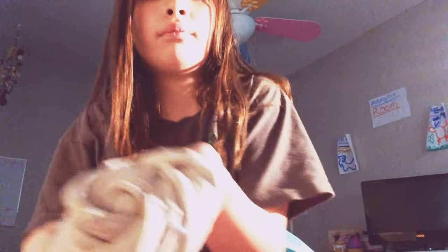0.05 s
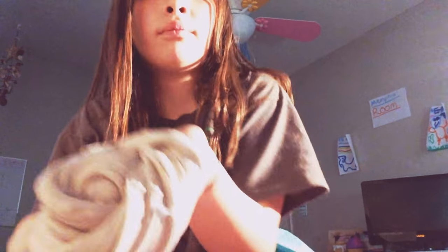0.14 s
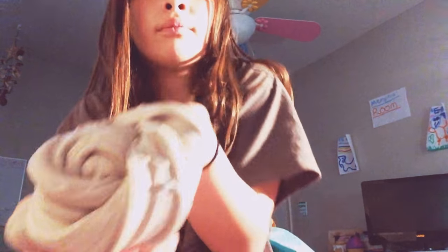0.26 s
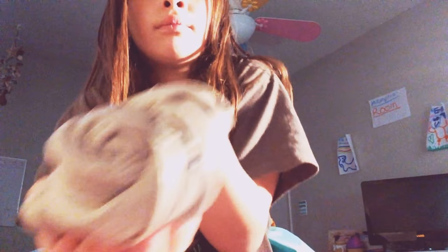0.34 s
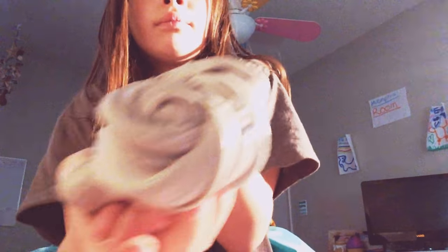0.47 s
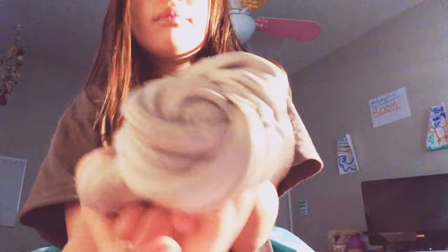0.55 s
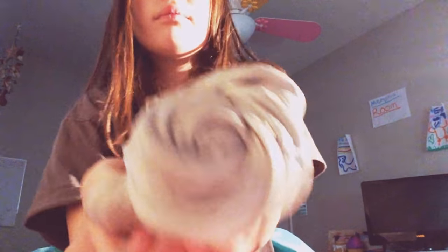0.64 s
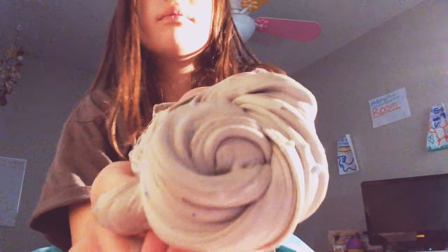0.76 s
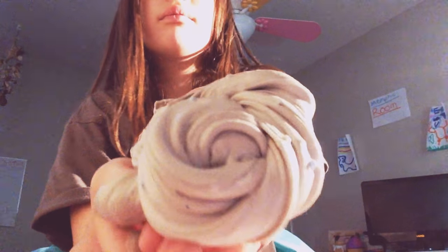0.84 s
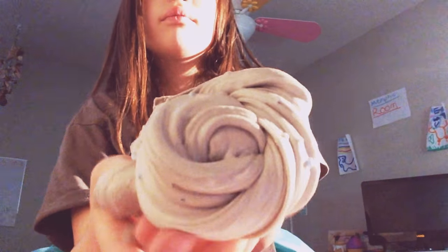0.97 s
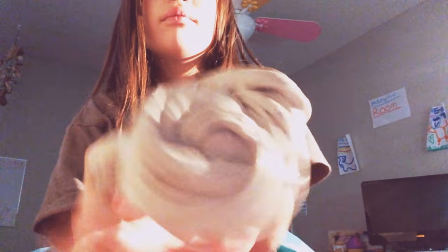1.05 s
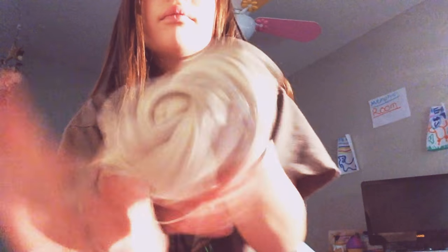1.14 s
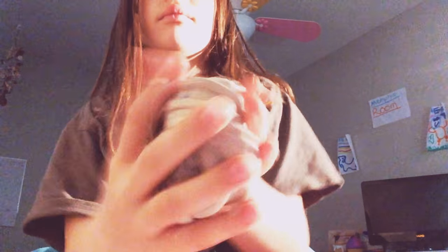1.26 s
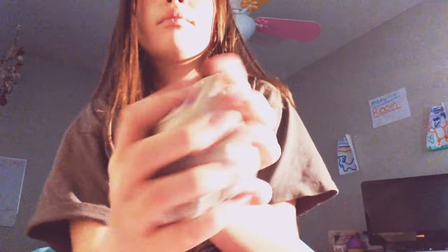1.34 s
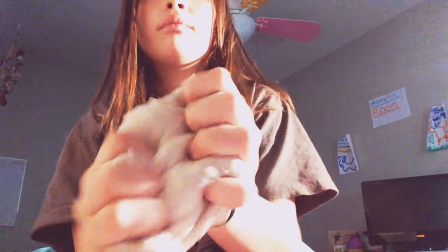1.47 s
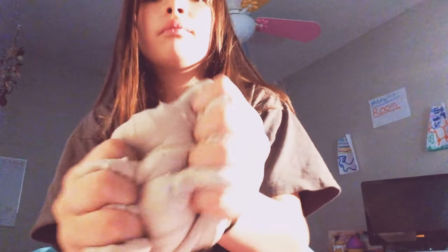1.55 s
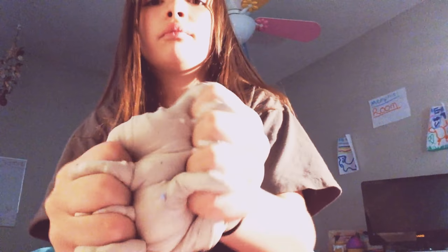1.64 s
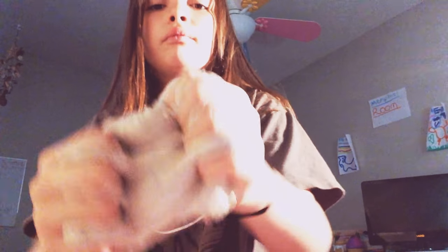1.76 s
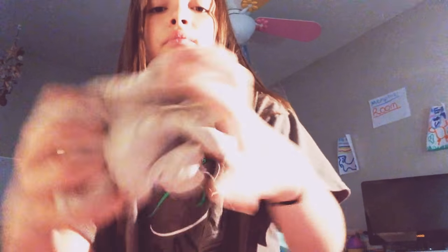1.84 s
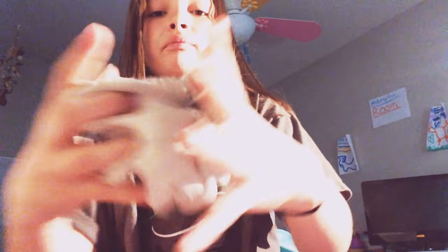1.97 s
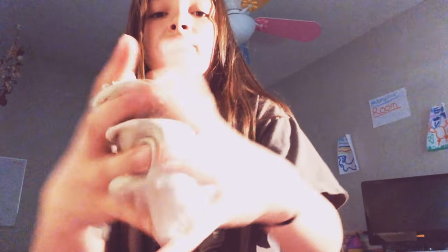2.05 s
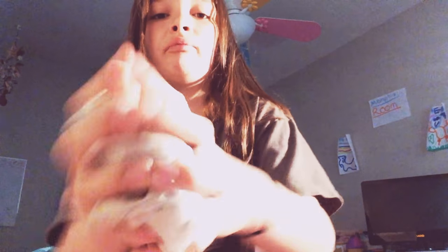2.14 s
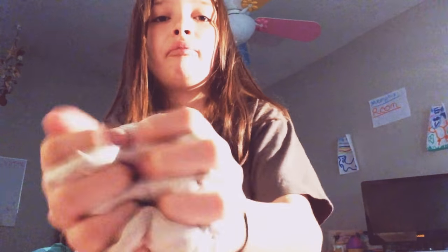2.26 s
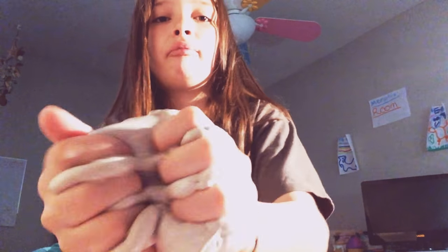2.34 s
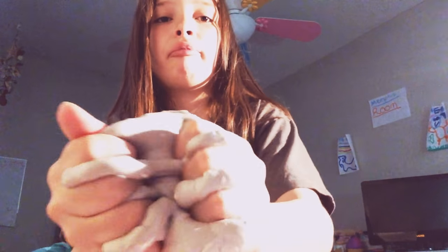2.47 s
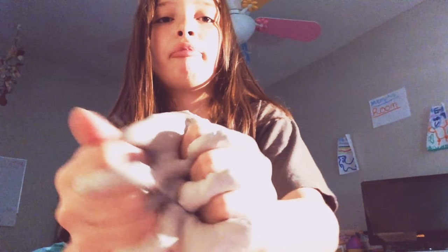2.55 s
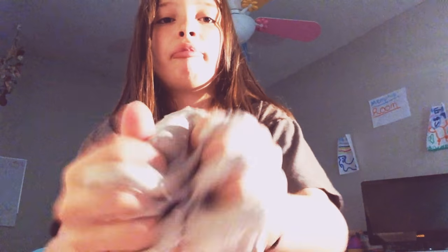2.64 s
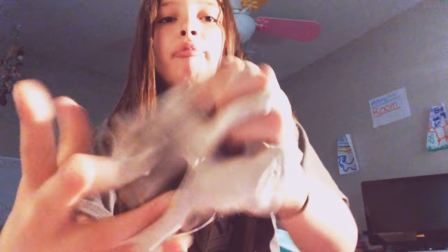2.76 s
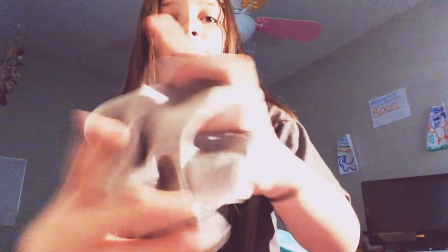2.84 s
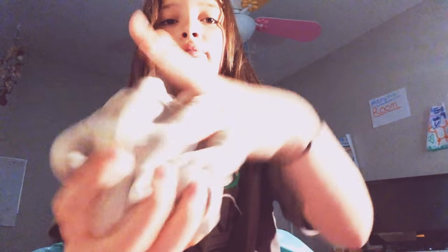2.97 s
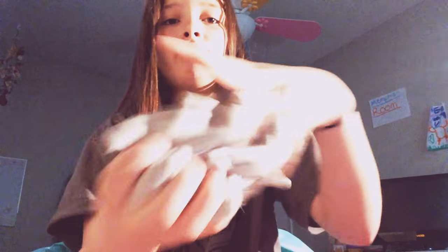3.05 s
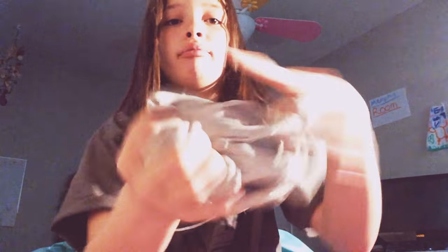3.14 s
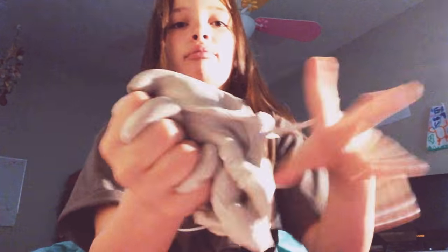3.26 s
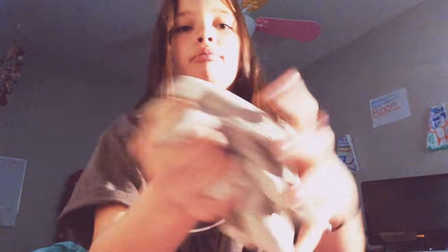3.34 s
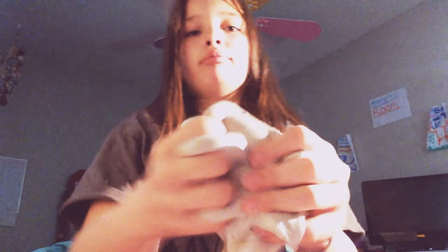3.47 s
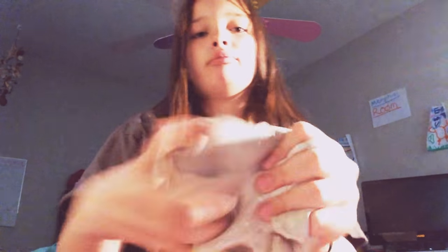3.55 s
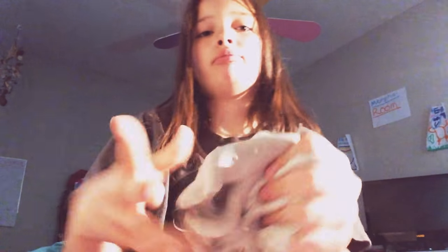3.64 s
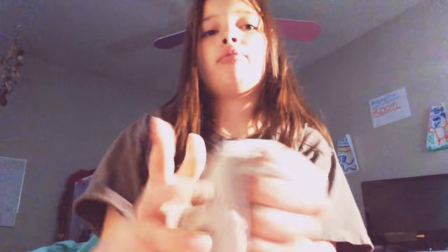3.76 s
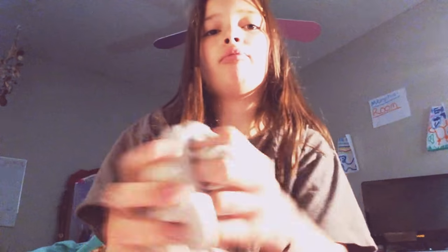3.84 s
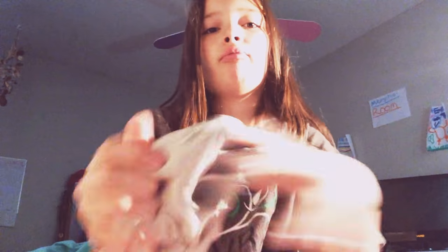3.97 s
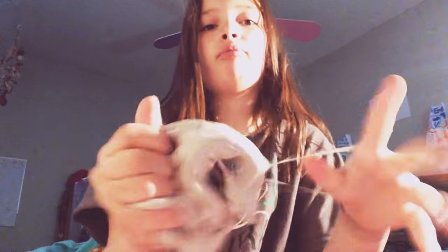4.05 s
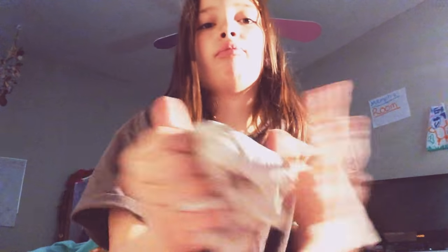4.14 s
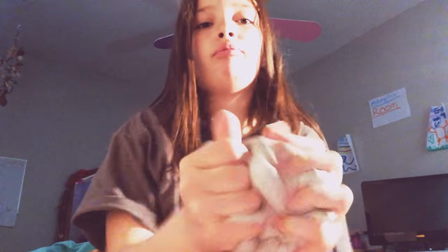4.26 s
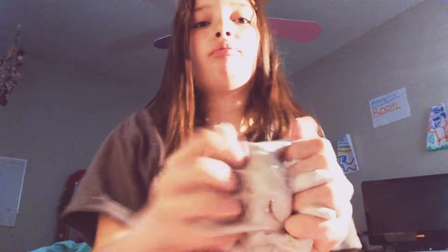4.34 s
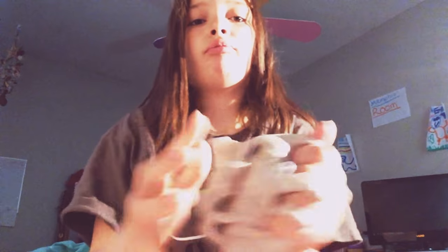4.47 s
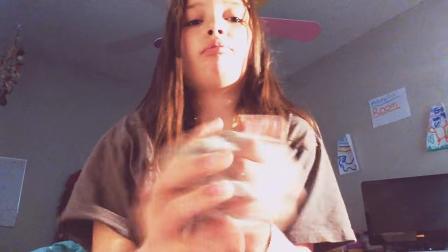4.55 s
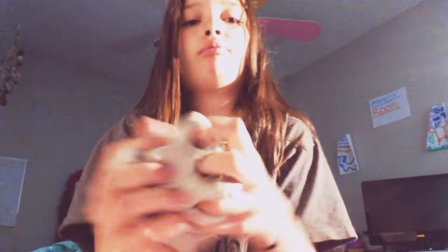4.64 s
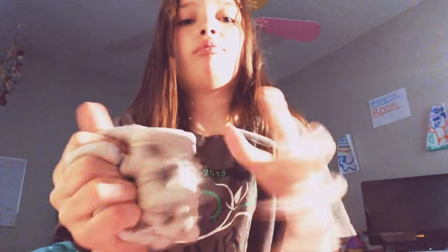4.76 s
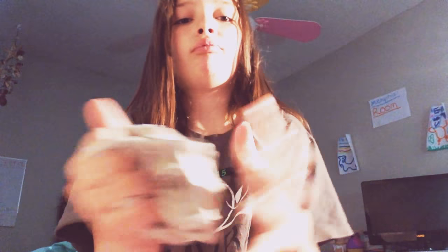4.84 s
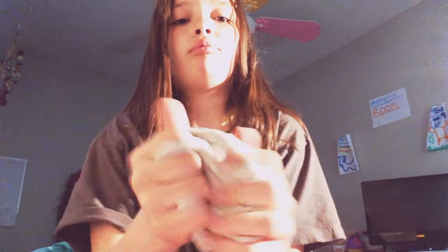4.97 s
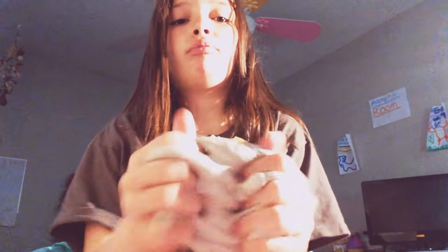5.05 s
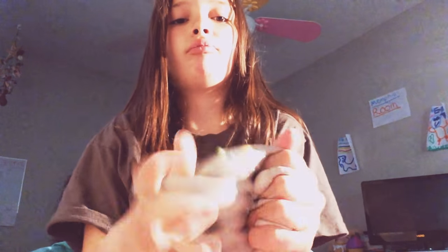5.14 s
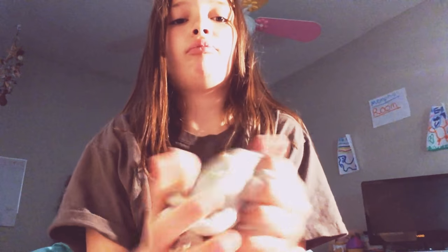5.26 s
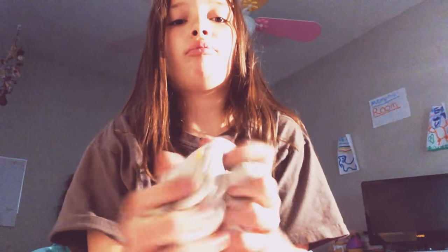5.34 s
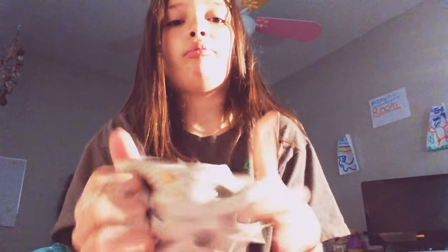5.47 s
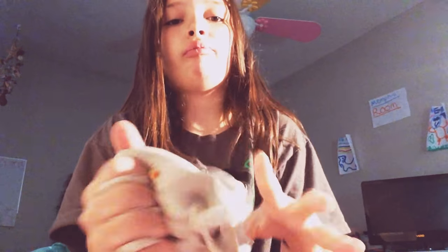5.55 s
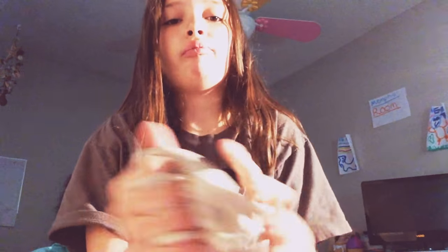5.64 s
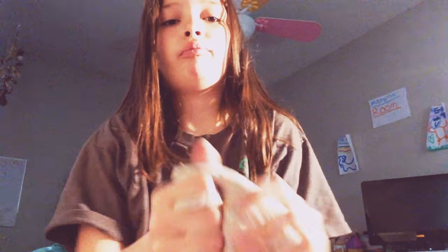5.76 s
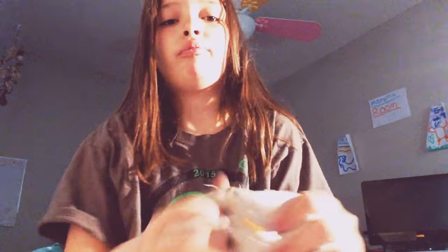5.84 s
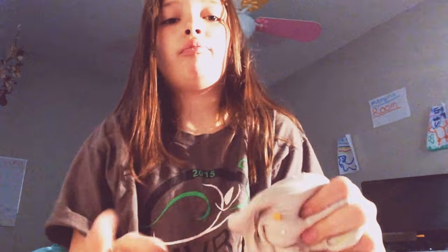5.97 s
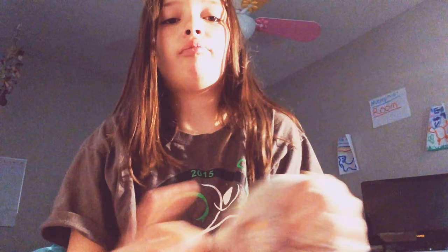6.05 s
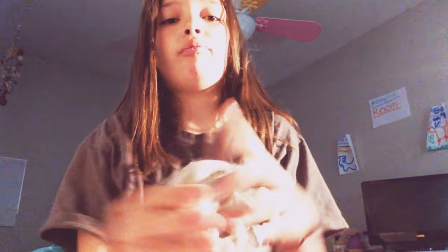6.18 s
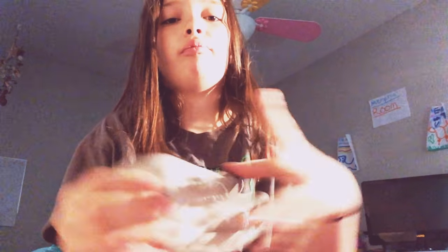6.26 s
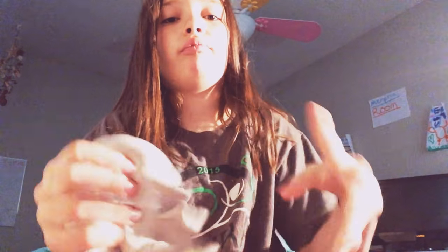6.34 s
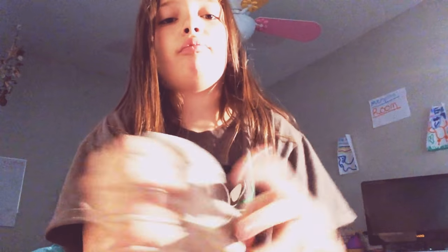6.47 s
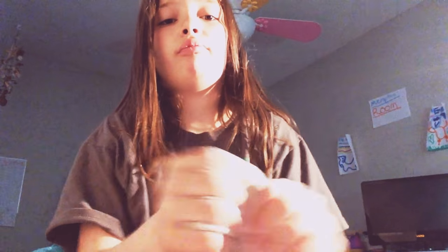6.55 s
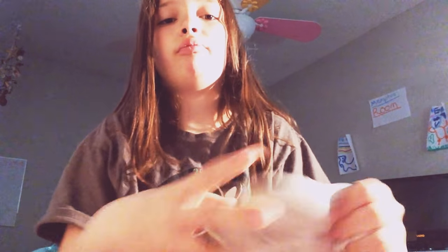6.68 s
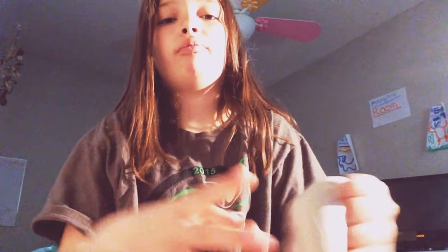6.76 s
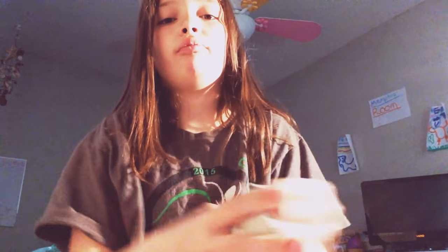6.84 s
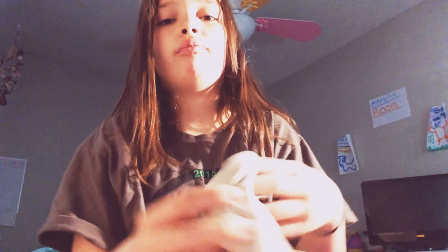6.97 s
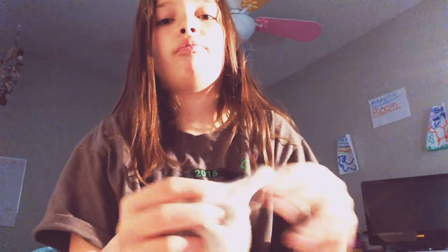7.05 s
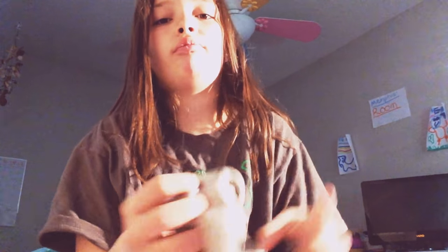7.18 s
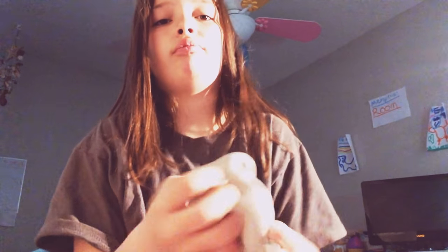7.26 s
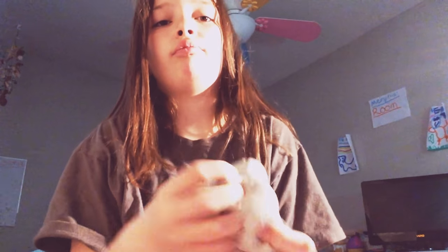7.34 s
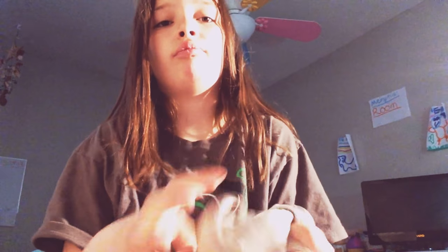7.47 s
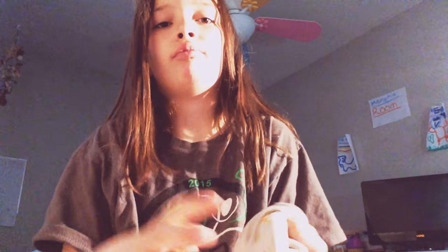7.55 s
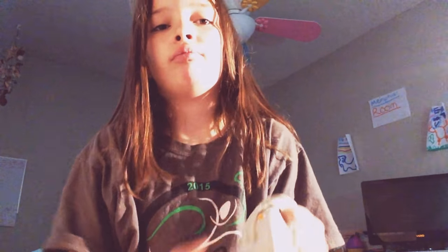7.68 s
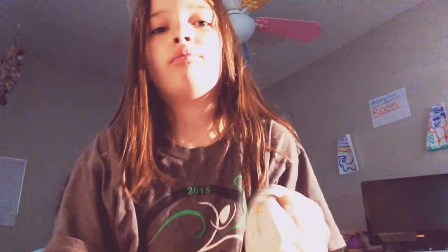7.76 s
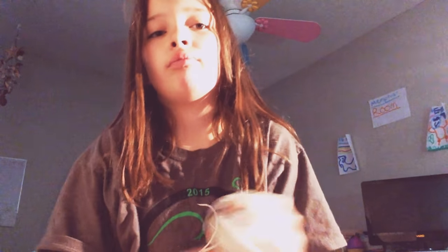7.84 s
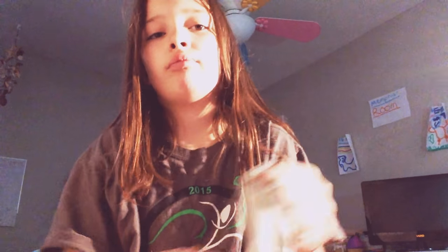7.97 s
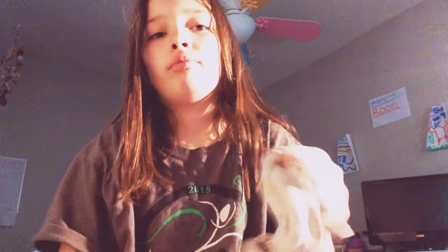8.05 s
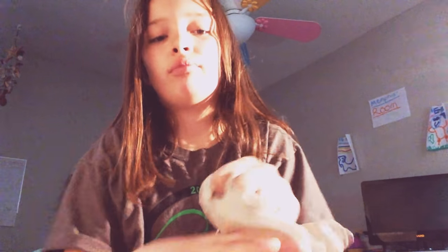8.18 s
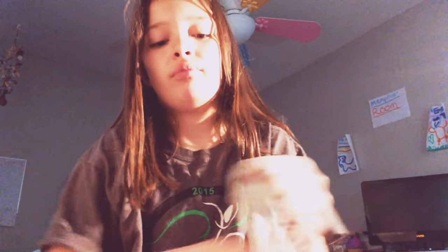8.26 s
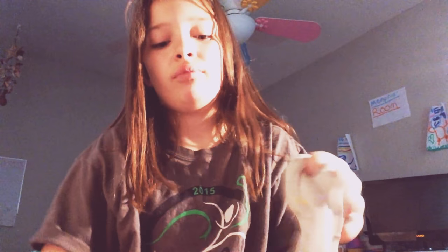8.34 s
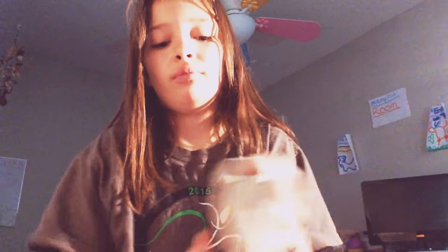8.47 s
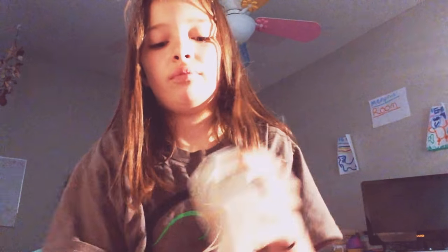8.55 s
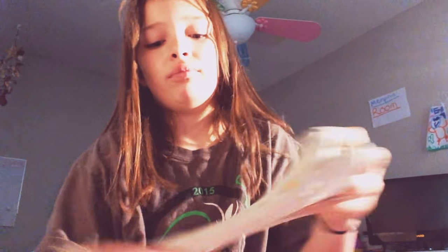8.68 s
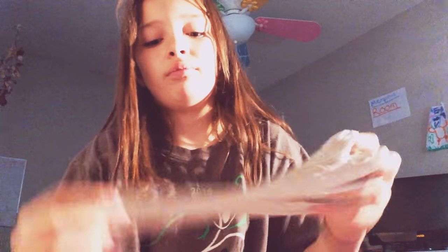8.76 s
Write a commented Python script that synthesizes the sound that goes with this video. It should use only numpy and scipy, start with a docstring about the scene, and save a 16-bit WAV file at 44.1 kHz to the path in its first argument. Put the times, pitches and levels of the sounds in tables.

```python
"""A quiet room, a small microphone close to two hands kneading a lump of fluffy slime.
Each squeeze bursts a random cloud of tiny ringing air cells: a low squelch and a high wet fizz.
Larger bubbles pop sharply, as a film snap plus a cavity ring; some open pockets ring on with filtered noise.
A near surface doubles every pop, the room adds wall reflections and a short tail to pops and kneading,
and sticky ticks, steady air noise and faint wavering hum tones lie beneath."""
import sys
import numpy as np
from scipy import signal
from scipy.fft import rfft, irfft, next_fast_len
from scipy.io import wavfile

SR = 44100
rng = np.random.default_rng(int(sys.argv[2]) if len(sys.argv) > 2 else 0)


def store_pcm(level_fs):
    """Save levels as 16-bit WAV."""
    pcm = np.round(np.clip(level_fs, -1, 1) * 32767).astype(np.int16)
    wavfile.write(sys.argv[1], SR, np.atleast_2d(pcm).T)


N = 388521
KNEAD_S = 1.4  # small bubbles and sticky ticks start here, s


def amp(db):
    """Decibels to an amplitude factor."""
    return 10 ** (np.asarray(db) / 20)


def unit(x):
    """Scales x to an RMS of one."""
    return x / np.sqrt(np.mean(x ** 2) + 1e-20)


def read(points, hz):
    """Reads a table of (Hz, value) joined by lines on a log-frequency axis."""
    f, value = np.transpose(points)
    return np.interp(np.log(hz + 1), np.log(f + 1), value)


def coloured(x, spectrum):
    """Filters x by the gains of a (Hz, dB) table."""
    size = next_fast_len(len(x))
    gain = amp(read(spectrum, np.fft.rfftfreq(size, 1 / SR)))
    return irfft(rfft(x, size) * gain, size)[:len(x)]


def causal(gain):
    """The minimum-phase response with this gain: sudden start, dying end."""
    both_sides = np.r_[gain, gain[-2:0:-1]]
    log_gain = np.log(np.maximum(both_sides, gain.max() * 1e-4))
    return np.exp(np.conj(signal.hilbert(log_gain)))[:len(gain)]


def add(mix, s, sound):
    """Lays a sound into the mix at s seconds, cut at the end of the mix."""
    part = mix[max(round(s * SR), 0):][:len(sound)]
    part += sound[:len(part)]


def pops(snap_low_hz=700, snap_top_hz=9000, bounce=0.54, bounce_s=.00116, bounce_hz=1500,
         wander=0.092, tear_s=0.00014, size=2048):
    """The film snaps, the opened cavity rings for a few cycles, and a near surface returns both."""
    # large bubbles: t/s, ring level/dB before colouring, cavity f/Hz, cavity Q,
    # snap level/dB before colouring, f/Hz above which slime muffles it, level/dB thrown into the room
    large_bubbles = [(0.142, -39, 950, 4, -60, 4000, 16.5), (1.5297, -19, 8100, 1.1, -26, 14300, 5),
                     (1.5521, 1, 11300, 5, -14, 10100, 6), (1.6184, -5.5, 5860, 1.6, -15.5, 10600, -0.5),
                     (1.6474, -14.5, 9350, 1.8, -24, 14500, -2), (1.6541, -13.5, 5520, 1.6, -42, 9200, 1),
                     (1.9577, -25, 960, 1.1, -20.5, 11100, 3.5), (2.0994, -26, 5400, 3.7, -53, 13800, 2),
                     (2.2301, -18, 10970, 5.5, -24, 20000, -1), (2.2344, -26, 2940, 6, -17, 10900, -2),
                     (2.3404, -4, 4610, .9, -12, 10600, -1.5), (2.4183, 5, 11230, 1.1, -19.5, 20000, 3),
                     (2.425, 8, 8950, 3.6, -8.5, 13100, -3), (2.4701, -16, 1260, 1.1, -46, 2220, 0),
                     (2.502, -20, 1480, 1, -45, 2500, 10), (3.0812, -31, 9300, 6, -30.5, 20000, -5),
                     (3.1817, -13, 13300, 1.3, -19.5, 5900, 3), (3.2204, -8, 4130, 1.2, -12, 10000, 2),
                     (3.343, -13.5, 11780, 2, -20, 20000, 1), (3.5424, -24, 684, 5.4, -17.5, 14500, 11),
                     (3.5513, -14, 5670, 3.9, -43, 13200, 6), (3.605, -14.5, 1080, 4.4, -23.5, 14000, -3),
                     (3.6315, -18, 2580, 1.8, -46, 14300, 5), (3.7133, -2.5, 13340, 4.7, -18.5, 12200, 1.5),
                     (3.7172, -17, 1180, 4.5, -23, 20000, 8), (3.7991, -25.5, 5190, 6, -25, 9100, 2.5),
                     (3.8304, -18.5, 543, 3.7, -32.5, 20000, 0),
                     (3.993, -13.5, 2380, 3.5, -7.5, 3700, -1.5),
                     (4.0454, -20.5, 8330, 1.7, -47, 12580, 2.5), (4.098, -35, 680, 7.6, -22.5, 13700, 7.5),
                     (4.1239, 1, 11890, .93, -29.5, 20000, -1.5),
                     (4.1908, -23.5, 11290, .7, -32, 12590, 0.5), (4.2045, 20, 6538, 1.3, 2.5, 6500, -1),
                     (4.2411, 12, 9500, 3.3, -5, 13000, 2.5), (4.3937, -22, 9700, 2.5, -27, 19840, 13),
                     (4.4485, 3.5, 7230, 2.3, -16.5, 20000, -1), (4.499, 5.5, 669, 2.8, 7, 16060, 0),
                     (4.5287, -21.5, 1590, 1.6, -10.5, 7900, 3.5), (4.5908, -25, 580, 1, -53.5, 2010, 12),
                     (4.773, -20.5, 6920, 6, -22.5, 12600, 6), (4.836, -25, 339, 3.6, -44, 13000, -2),
                     (4.8497, 14.5, 10480, 3.9, -1.5, 8280, 0.5),
                     (4.9466, -18.5, 1210, 3.1, -21, 20000, 3.5), (4.9505, -27, 383, .8, -15, 9500, -1),
                     (5.3869, -27, 1060, 1.4, -30, 17000, 9), (5.9523, -7, 6270, .76, -34, 12300, 2.5),
                     (6.1632, -23, 870, 2, -24, 16000, 10), (6.339, -39, 370, 2, -19, 9900, 5),
                     (6.3472, -5.5, 10800, 5.5, -22, 12450, -7.5), (6.6249, -26.5, 377, .8, -39, 13700, -5),
                     (6.6553, -12.5, 12800, 6, -14, 15000, 4), (6.895, -29, 614, 1.2, -42, 20000, 4),
                     (6.9628, -20, 4020, 4.6, -38, 14800, 9), (7.3042, -31, 2190, 5, -42, 20000, 5),
                     (7.406, -30.5, 356, 4.2, -29, 20000, 3), (7.8916, -23.5, 430, 1.5, -24.5, 20000, 1.5),
                     (7.911, -26.5, 740, 1.5, -38, 20000, .5), (8.1729, -25.5, 850, 4, -27.5, 20000, 4),
                     (8.1769, -19.5, 1060, 3.7, -29, 20000, 3), (8.5939, -30.5, 927, 1.2, -32.5, 13220, 7)]
    # colour of the pops at the microphone: f/Hz, level/dB
    pop_colour = [(40, -27), (110, -8.5), (200, 8), (430, 0.5), (850, 0), (1400, 1.5), (2600, 0.5),
                  (3900, -6.5), (5300, -5), (6200, 0.5), (7400, -6.5), (9300, 5), (10600, -1), (15500, 0.5)]
    direct, thrown = np.zeros(N), np.zeros(N)
    f = np.fft.rfftfreq(size, 1 / SR)
    snap = unit(f / np.hypot(f, snap_low_hz) / np.hypot(1, f / snap_top_hz))
    colour = amp(read(pop_colour, f))
    bubbles = large_bubbles + small_bubbles()
    places = rng.uniform(-1, 1, size)
    for place, (s, ring_db, hz, q, snap_db, muffle_hz, room_db) in zip(places, bubbles):
        ring = unit(f / np.hypot(f, q * (hz - f * f / hz)))
        muffle = np.sqrt(1 / (1 + (f / muffle_hz) ** 10) + 0.03)
        burst = causal(colour * muffle * np.hypot(amp(ring_db) * ring, amp(snap_db) * snap))
        # a larger, lower bubble takes longer to tear open, which spreads its treble in time
        lag = tear_s * (snap_top_hz / hz) ** .6 * f / snap_top_hz
        burst = burst * np.exp(-1j * np.pi * f * lag)
        # the small surface returns mostly treble, over a path that differs as the hands move
        delay = bounce_s * (1 + wander * place)
        echo = bounce * f / (f + bounce_hz) * np.exp(-2j * np.pi * f * delay)
        add(direct, s, irfft(burst * (1 + echo))[:size // 2])
        # how much reaches the walls depends on which way the bubble opens
        add(thrown, s, amp(room_db) * irfft(burst)[:size // 2])
    return direct + room(thrown)


def small_bubbles(per_s=8, crowding=.4, light_touch=.15, firm_db=-54, growth=.25,
                  ring_db=-30.5, snap_db=-33, spread_db=4, low_hz=400, high_hz=10000,
                  q=3, muffle_hz=12000, room_db=1, count=512):
    """Faint pops, as rows like those of the large bubbles; firm pressure bursts more, and louder."""
    when, size, ring, snap = rng.random((count, 4)).T
    # force as a share of a firm squeeze, never below a light touch
    force = np.maximum(pressure(column=1) / amp(firm_db), light_touch)
    chance = force ** crowding * (np.arange(N) > KNEAD_S * SR)
    # running count of bubbles, averaging per_s over the kneading
    expected = np.cumsum(chance) / chance.sum() * per_s * (N / SR - KNEAD_S)
    starts = np.searchsorted(expected, np.arange(count) + when)
    push_db = growth * 20 * np.log10(force)
    rows = []
    for at, ring_draw, pitch_draw, snap_draw in zip(starts, 2 * ring - 1, size, 2 * snap - 1):
        if at < N:
            ring_level = ring_db + push_db[at] + spread_db * ring_draw
            snap_level = snap_db + push_db[at] + spread_db * snap_draw
            hz = low_hz * (high_hz / low_hz) ** pitch_draw
            rows.append((at / SR, ring_level, hz, q, snap_level, muffle_hz, room_db))
    return rows


def pockets():
    """Escaping air keeps a soft-walled pocket ringing unevenly for a moment."""
    # air pockets ringing on after a burst: t/s, f/Hz, level/dB before onset and decay, t60/s, Q
    open_pockets = [(3.718, 1140, -53.5, 0.16, 6.8), (3.831, 510, -49.5, 0.16, 3.2),
                    (4.499, 653, -13.5, 0.025, 5.9), (4.499, 1270, -10.5, 0.015, 6),
                    (4.503, 320, -35, 0.082, 2), (4.515, 1354, -37, .15, 1.5),
                    (7.893, 450, -55.5, 0.11, 1.7), (8.195, 300, -52.5, 0.092, 2)]
    out, t = np.zeros(N), np.arange(SR // 4) / SR
    noises = rng.standard_normal((len(open_pockets), SR))
    for (s, hz, db, t60, q), air in zip(open_pockets, noises):
        cavity = signal.iirpeak(hz, q, fs=SR)
        resonant_air = signal.lfilter(*cavity, signal.lfilter(*cavity, air))
        ring = unit(resonant_air)[-len(t):]
        decay = np.exp(-np.log(1000) * t / t60)
        onset = 1 - np.exp(-hz * t)
        add(out, s, amp(db) * ring * decay * onset)
    return out


def kneading(squelch_db=0.5, fizz_db=0.0, room_db=2):
    """Each squeeze drives the squelch and the fizz; a broad crackle sounds in both."""
    # squelch of the larger air cells: f/Hz, filter level/dB
    squelch_colour = [(60, -32.5), (170, -5.5), (330, 0.5), (450, -10), (750, 0), (1350, -5), (1750, -3),
                      (2250, -6), (2800, -5), (3800, -11.5), (7000, -27)]
    # fizz of the smallest air cells: f/Hz, filter level/dB
    fizz_colour = [(600, -33.5), (2700, -8.5), (4000, -7.5), (5000, -6.5), (6200, -1), (7600, -7),
                   (9500, 2.5), (11200, -4), (14200, -1), (16000, -10)]
    crackle = amp(-10) * cells(per_s=2500, spread_db=3.5)
    large = ringing_cells(low_hz=300, high_hz=3600, q=6, per_s=140, spread_db=3.5, clump_db=9)
    small = ringing_cells(low_hz=3500, high_hz=15000, q=9, per_s=330, spread_db=3.8, clump_db=8)
    squelch = amp(squelch_db) * unit(coloured(large + 2 * crackle, squelch_colour))
    fizz = amp(fizz_db) * unit(coloured(small + crackle, fizz_colour))
    lurch = stick_slip(depth_db=3.5, per_s=65)
    wet = lurch * (squelch * pressure(column=0) + fizz * pressure(column=1))
    return wet + amp(room_db) * room(wet)


def pressure(column):
    """Level of one layer, squelch (0) or fizz (1), as the fingers press in and let go."""
    # squeezes and pulls: peak t/s, rise t/s and fall t/s (to 1/e of the peak amplitude),
    # squelch level/dB and fizz level/dB, both before layer trims and lurches
    squeezes = [(1.16, .057, .088, -69.5, -62), (1.46, .12, .34, -86, -65.5), (1.852, .046, .09, -52, -47),
                (2.381, .26, .15, -67, -65.5), (2.742, .068, .089, -52.5, -49.5),
                (3.17, .18, .16, -69.5, -64.5), (3.553, .046, .073, -54, -50.5),
                (3.925, .085, 0.11, -57.5, -54), (4.381, .08, .11, -59.5, -52),
                (4.684, .046, .1, -58, -53.5), (5.135, .09, .058, -58, -52.5),
                (5.397, .055, .11, -60, -55.5), (5.93, .09, .058, -59.5, -50),
                (6.171, .014, .11, -57.5, -51.5), (6.672, .06, .06, -57, -52.5),
                (6.97, .092, .05, -65, -60), (7.415, .018, .083, -64, -58), (7.899, .012, .016, -63, -62),
                (8.022, .054, .022, -67, -59), (8.32, .12, .03, -65, -64.5), (8.551, .11, .087, -65, -64.5)]
    t, power = np.arange(0, N, 64) / SR, 0
    for s, rise, fall, *levels_db in squeezes:
        away = abs(t - s) / np.where(t < s, rise, fall)
        power = power + amp(levels_db[column]) ** 2 * np.exp(-2 * away ** 2)
    return np.interp(np.arange(N) / SR, t, np.sqrt(power))


def ringing_cells(low_hz, high_hz, q, per_s, spread_db, clump_db, count=14):
    """Cells of many sizes ring briefly, each size at its own pitch, rate per_s and clumps."""
    out = np.zeros(N)
    for hz in np.geomspace(low_hz, high_hz, count):
        clump = stick_slip(depth_db=clump_db, per_s=55)
        bursts = clump * cells(per_s, spread_db)
        out += signal.lfilter(*signal.iirpeak(hz, q, fs=SR), bursts)
    return unit(out)


def cells(per_s, spread_db):
    """Air cells burst at random as clicks of either sign: mostly tiny, a few large."""
    size_db = spread_db * np.minimum(rng.exponential(1, N), 3.8)
    sizes = amp(size_db) * rng.choice([-1, 1], N)
    return unit(sizes * (rng.random(N) < per_s / SR))


def stick_slip(depth_db, per_s):
    """The slime gives way in small uneven lurches: a gain gliding between random levels."""
    knots = np.arange(0, N + SR, SR / per_s)
    levels = rng.uniform(-0.73, 1, len(knots))
    return amp(depth_db * np.interp(np.arange(N), knots, levels))


def sticky_ticks(level_db=-76):
    """Fingers peel off the tacky surface with faint soft ticks from KNEAD_S on."""
    ticks = ringing_cells(low_hz=500, high_hz=11000, q=3, per_s=4, spread_db=2, clump_db=2)
    return amp(level_db) * ticks * (np.arange(N) > KNEAD_S * SR)


def room(x, tail_db=-18, build_s=0.008, near_db=-17, near_s=0.0031):
    """Scatter off hands and body, a few wall reflections, then a short diffuse tail."""
    # room decay: f/Hz, t60/s
    room_t60 = [(200, .33), (1000, 0.17), (4000, 0.44), (9000, 0.22), (16000, 0.18)]
    # first wall reflections: delay t/s, level/dB
    walls = [(.0093, -24.5), (0.0208, -32.5), (0.0279, -30)]
    t = np.arange(SR // 2) / SR
    # noise whose bands each die away at their own rate
    hz, when, z = signal.stft(rng.standard_normal(len(t)), SR, nperseg=256)
    decay = np.exp(-np.log(1000) * when / read(room_t60, hz)[:, None])
    tail = signal.istft(z * decay, SR, nperseg=256)[1][:len(t)]
    tail = tail * (1 - np.exp(-(t / build_s) ** 2))
    near = rng.standard_normal(len(t)) * t * np.exp(-t / near_s * 2)
    response = amp(tail_db) * tail / np.linalg.norm(tail)
    response += amp(near_db) * near / np.linalg.norm(near)
    for delay, db in walls:
        response[round(delay * SR)] += amp(db)
    return signal.oaconvolve(x, response)[:N]


def background(air_db=-64.5, hum_db=-1, waver=.005, flutter_db=2.5):
    """Steady noise of room air and microphone hiss, with faint wavering hum tones."""
    # still room and microphone hiss: f/Hz, filter level/dB
    air_colour = [(25, -35), (70, -25.5), (110, -8), (170, -2), (300, -7), (450, -12.5), (620, -10.5),
                  (950, -17), (2300, -19), (4500, -21), (9500, -21), (16000, -24.5)]
    # hum tones: centre f/Hz, RMS level/dB before hum_db and flutter, start t/s, end t/s
    hum_tones = [(352, -72, -.2, .6), (393, -71, .95, 3.3), (393, -76, 3.2, 4.5), (620, -77, .5, 1.5),
                 (600, -80, 5.8, 8.8)]
    t, knots = np.arange(N) / SR, np.arange(0, N / SR + 1, 1 / 10)
    out = amp(air_db) * unit(coloured(rng.standard_normal(N), air_colour))
    for hz, db, start, end in hum_tones:
        drift = np.interp(t, knots, rng.standard_normal(len(knots)))
        swell = np.interp(t, knots, rng.standard_normal(len(knots)))
        fade = np.clip(np.minimum(t - start, end - t) / .22, 0, 1)
        level = np.sqrt(2) * amp(db + hum_db + flutter_db * swell)
        phase = 2 * np.pi * np.cumsum(hz * (1 + waver * drift)) / SR
        out += level * fade * np.sin(phase)
    return out


def scene():
    """Everything that reaches the microphone, on one channel."""
    return (pops() + pockets() + kneading() + sticky_ticks() + background())[None]


def record(dry, bend=0.014, edge_hz=16200):
    """The input bends slightly lopsidedly and clips beyond full scale; then the band limit."""
    clipped = np.clip(dry - bend * dry ** 2, -1, 1)
    low_pass = signal.firwin(255, edge_hz, window=("kaiser", 8), fs=SR)
    return signal.oaconvolve(clipped, low_pass[None], "same")


dry = scene()
out = record(dry)
store_pcm(out)
```